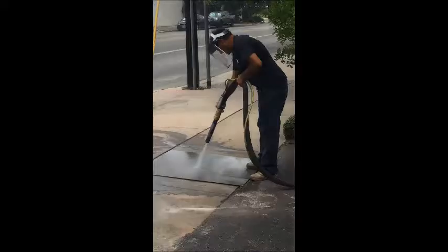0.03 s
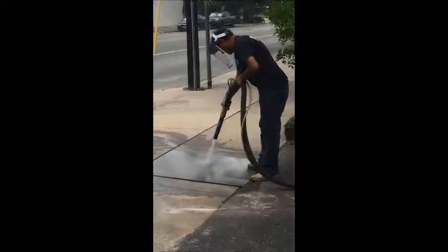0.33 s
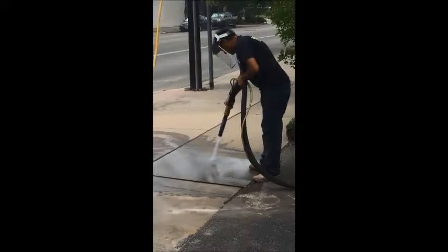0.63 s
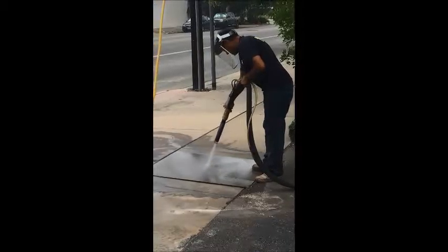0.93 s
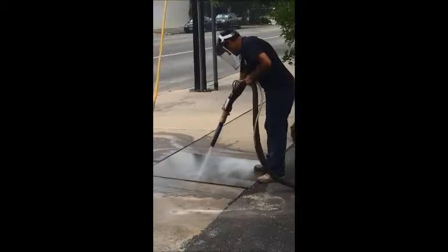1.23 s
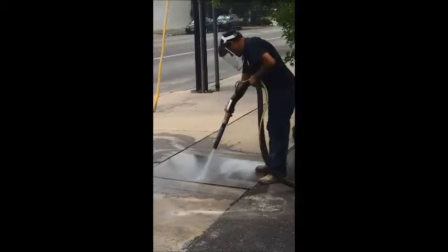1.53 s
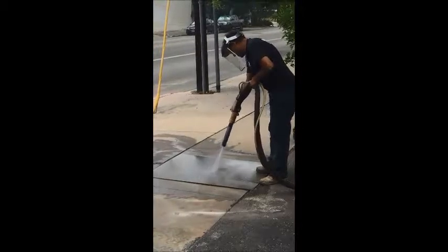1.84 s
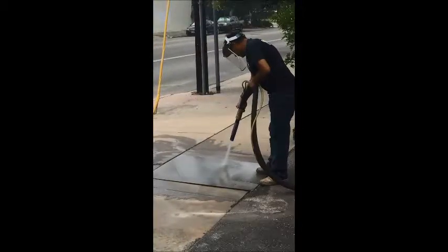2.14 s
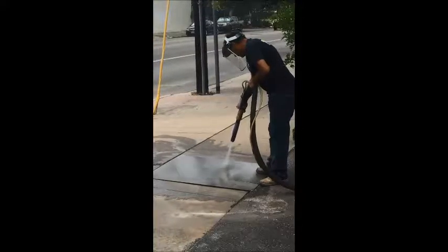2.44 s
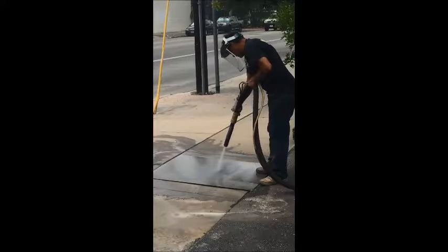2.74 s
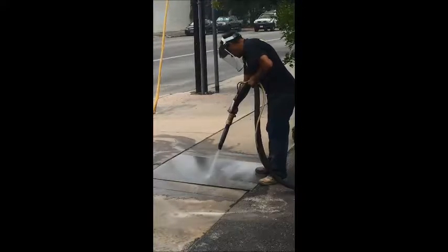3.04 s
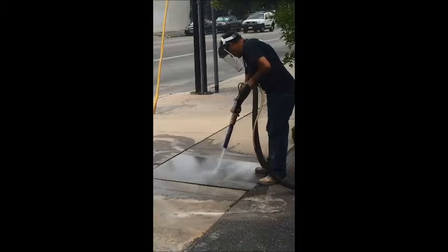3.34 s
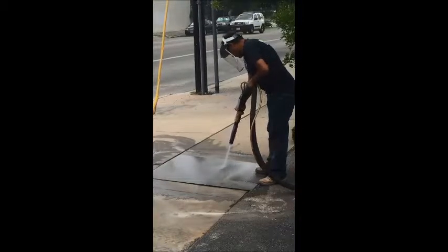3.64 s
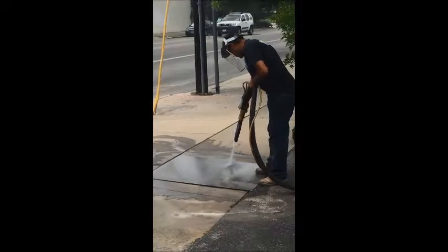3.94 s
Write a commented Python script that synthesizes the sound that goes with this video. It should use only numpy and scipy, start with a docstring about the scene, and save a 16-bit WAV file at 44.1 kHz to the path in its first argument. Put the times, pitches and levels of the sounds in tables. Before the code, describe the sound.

A loud hiss of pressurized spray hitting pavement cuts in just after the start and holds until the end at 4 seconds, mixed with fine spatter. The jet's roar on the concrete sinks around 0.6 to 0.9 seconds and again near 2.5 seconds, swelling back each time while the bright hiss stays even. Underneath, a faint throbbing engine hum, a deeper machine hum and low traffic rumble continue throughout.

```python
"""A steady hiss cuts in: a pressure lance blasts spray onto a pavement beside a road.
Turbulence makes both the nozzle's hiss and the jet's roar on the slab, and the barrel's resonances
colour them. The roar sinks and swells again twice as the lance sweeps to and fro, and drops spatter.
Behind it hum an engine, at harmonics of its firing rate, and a deeper machine, over rumbling traffic."""
import sys
import numpy as np
from scipy import signal
from scipy.fft import rfft, irfft
from scipy.io import wavfile
from scipy.ndimage import uniform_filter1d, map_coordinates

SR = 44100
rng = np.random.default_rng(int(sys.argv[2]) if len(sys.argv) > 2 else 0)


def bounce(signal):
    """Save signal as a 16-bit WAV file at the path given by the first command-line argument."""
    frames = np.transpose(np.atleast_2d(signal))
    limited = np.clip(frames, -1, 1)
    pcm = np.round(limited * 32767).astype(np.int16)
    wavfile.write(sys.argv[1], SR, pcm)


N = 176400
TIME = np.arange(N) / SR
BIN_HZ = np.fft.rfftfreq(N, 1 / SR)

# Nozzle hiss. Each row: frequency in Hz, base level in dB per Hz.
HISS_SPECTRUM = [(100, -85), (480, -69), (720, -63.5), (1300, -56.5), (2300, -61), (3500, -57), (4850, -62),
                 (5900, -59.5), (7600, -61.5), (8500, -58), (9600, -58), (10400, -63), (11300, -58.2),
                 (12300, -58.3), (14000, -62), (15700, -64)]
# Strength of hiss and spatter. Each row: time in seconds, gain in dB.
SPRAY_GAIN = [(.15, -0.2), (.7, -0.3), (1.05, 1.1), (1.3, 0), (1.7, 2), (1.87, 1), (2.18, -0.9),
              (2.55, 0.7), (2.9, 0.6), (3.15, 1), (3.4, 1.5), (3.56, -0.4), (4, -0.5)]
# Resonances of the lance's barrel. Each row: centre in Hz, half-width in Hz, lift in dB.
BARREL_MODES = [(677, 130, 2), (1360, 87, 0.5), (1996, 196, 3.5), (2506, 120, 2.5), (3130, 127, 4.5),
                (3650, 203, 4), (4310, 250, 2.7), (5490, 200, 2.3)]
# Roar on the slab. Each row: frequency in Hz, base level in dB per Hz.
ROAR_SPECTRUM = [(100, -90), (450, -73.5), (750, -64), (1250, -56), (1900, -54.5), (3300, -56.5),
                 (4800, -62), (6500, -59), (9000, -75), (15700, -77)]
# Strength of the roar as the lance sweeps. Each row: time in seconds, gain in dB.
SWEEP_GAIN = [(.15, -0.5), (.45, -2.5), (.62, -7.5), (.92, -11), (1.15, -0.5), (1.36, .3), (1.8, -0.5),
              (2.08, -1.5), (2.3, -5.5), (2.5, -23), (2.66, -8.5), (2.78, -3), (3.05, -0.2), (3.28, 0.5),
              (3.46, 0), (3.6, -2), (3.82, -2.5), (4, -6)]
# Drop impacts. Each row: frequency in Hz, base level in dB per Hz.
SPATTER_SPECTRUM = [(200, -99), (1200, -64), (3500, -65.5), (7000, -72.5), (12000, -69), (15700, -69)]
# Faint copies of the spray. Each row: lag in seconds before the drift is added, linear gain.
SPRAY_COPIES = [(.0043, 0.11), (.0091, .12), (.0170, 0.11)]
# Engine speed. Each row: time in seconds, firing rate in Hz.
FIRING_RATE = [(0, 111.6), (1.5, 111.8), (2.8, 111.6), (4, 111.3)]
# Engine tones. Each row: multiple of the firing rate, base rms level in dB.
ENGINE_HARMONICS = [(1, -38), (2, -49), (3, -49.5), (4, -47), (6, -49.5)]
# Throb of the fundamental. Each row: time in seconds, gain in dB.
THROB_GAIN = [(.22, 2), (.42, -2.5), (.62, 0.5), (.9, 3.5), (1.25, -2), (1.44, 3), (1.68, 1), (1.8, -6),
              (1.98, 0), (2.24, 1.7), (2.48, -1), (2.66, 0), (2.82, 3), (3.05, -1), (3.2, -2.5), (3.55, 1),
              (3.75, -1), (4, -3)]
# Strength of the engine's overtones. Each row: time in seconds, gain in dB.
OVERTONE_GAIN = [(0, -3.5), (1.2, 0.5), (2.5, 1.5), (4, 1)]
# Rumble of road and machinery. Each row: frequency in Hz, base level in dB per Hz.
RUMBLE_SPECTRUM = [(15, -90), (35, -92), (52, -74), (105, -70), (155, -71), (230, -70.5), (310, -65.5),
                   (420, -71.5), (700, -69.5), (2000, -86)]
# Strength of the rumble as cars go by. Each row: time in seconds, gain in dB.
TRAFFIC_GAIN = [(0, -2), (1, 1), (2.1, -1.8), (2.55, 2), (2.85, -0.5), (3.3, -1.5), (4, 0.5)]


def amp(db):
    """Amplitude grows tenfold for every 20 dB."""
    return 10 ** (np.asarray(db) / 20)


def unit_rms(x):
    """Normalisation to an rms of 1."""
    return x / np.sqrt(np.mean(x ** 2) + 1e-20)


def curve(points):
    """Linear interpolation of a time table at every sample."""
    return np.interp(TIME, *np.transpose(points))


def colour(white, spectrum, lift_db=0):
    """Spectral shaping: white sound of rms 1 takes on a density in dB per Hz, plus a lift."""
    hz, db = np.transpose(spectrum)
    shape_db = np.interp(np.log(BIN_HZ + 1), np.log(hz), db) + lift_db
    return irfft(rfft(white) * amp(shape_db), N) * np.sqrt(SR / 2)


def wander(rate_hz):
    """Random modulation of rms 1: noise low-passed to between 1 Hz and about the given rate."""
    response = (BIN_HZ > 1) / (1 + (BIN_HZ / rate_hz) ** 2)
    return unit_rms(irfft(rfft(rng.standard_normal(N)) * response, N))


def turbulence(flutter_db, flutter_hz=70, patch_db=1.12, patch_s=0.05, patch_hz=400):
    """Unsteady flow modulates white noise, as a whole and in patches of time and frequency."""
    hz, seconds, cells = signal.stft(rng.standard_normal(N), SR, nperseg=512)
    patches = rng.standard_normal(cells.shape)
    patches = uniform_filter1d(patches, round(patch_s / seconds[1]), axis=1)
    patches = unit_rms(uniform_filter1d(patches, round(patch_hz / hz[1]), axis=0))
    noise = signal.istft(cells * amp(patch_db * patches), SR, nperseg=512)[1][:N]
    return unit_rms(noise * amp(flutter_db * wander(flutter_hz)))


def jet():
    """Turbulence radiates broadband noise at nozzle and slab; barrel resonances lift narrow bands."""
    barrel_db = sum(db * np.exp(-((BIN_HZ - hz) / width) ** 2) for hz, width, db in BARREL_MODES)
    hiss = colour(turbulence(flutter_db=0.7), HISS_SPECTRUM, barrel_db)
    roar = colour(turbulence(flutter_db=0.6), ROAR_SPECTRUM, barrel_db)
    return hiss * amp(curve(SPRAY_GAIN)) + roar * amp(curve(SWEEP_GAIN))


def spatter(drops_per_s=3500, spread_db=4.0):
    """Shot noise: drops strike the pavement independently, many small and a few large."""
    size_db = spread_db * np.minimum(rng.exponential(1, N), 4)
    polarity = np.sign(rng.standard_normal(N))
    strikes = rng.random(N) < drops_per_s / SR
    ticks = unit_rms(amp(size_db) * polarity * strikes)
    return colour(ticks, SPATTER_SPECTRUM) * amp(curve(SPRAY_GAIN))


def thicken(spray, drift_s_per_db=0.05):
    """Superposition: faint time-warped copies of the spray, mostly ahead of it, thicken the hiss."""
    drift_s = drift_s_per_db * curve(SWEEP_GAIN)  # mostly negative: a lead of up to about 1.1 s
    total = spray
    for lag_s, gain in SPRAY_COPIES:
        positions = (TIME - lag_s - drift_s) * SR
        total = total + gain * map_coordinates(spray, [positions], order=3)
    return total


def engine(waver_hz=9.6, waver_db=2, pitch_wander=0.0034):
    """Periodic firing at a governed speed gives a throbbing fundamental and wavering harmonics."""
    firing_hz = curve(FIRING_RATE) * (1 + pitch_wander * wander(waver_hz))
    cycles = np.cumsum(firing_hz) / SR
    tones = np.zeros(N)
    for order, db in ENGINE_HARMONICS:
        if order == 1:
            sway_db = curve(THROB_GAIN)
        else:
            sway_db = curve(OVERTONE_GAIN) + waver_db * wander(waver_hz)
        tones += amp(db + sway_db) * np.sin(2 * np.pi * (order * cycles + rng.random()))
    return np.sqrt(2) * tones


def machine_hum(hz=64.8, rms_db=-47, waver_db=0.3):
    """A second machine hums lower: a pure tone under slight amplitude modulation."""
    level_db = rms_db + waver_db * wander(rate_hz=9.6)
    return np.sqrt(2) * amp(level_db) * np.sin(2 * np.pi * hz * TIME)


def road_rumble():
    """Incoherent sources sum to low-frequency noise, which swells a little with the traffic."""
    return colour(rng.standard_normal(N), RUMBLE_SPECTRUM) * amp(curve(TRAFFIC_GAIN))


def scene():
    """Superposition: all sources add at one point, the same in both channels."""
    spray = thicken(jet() + spatter())
    mono = spray + engine() + machine_hum() + road_rumble()
    return np.array([mono, mono])


def record(dry, start_s=0.1537, cutoff_hz=15800):
    """Gating and band limiting: the sound cuts in at once, and a low-pass removes the top treble."""
    lowpass = signal.firwin(511, cutoff_hz, window=("kaiser", 9), fs=SR)
    return signal.oaconvolve(dry * (TIME >= start_s), lowpass[None], "same")


dry = scene()
out = record(dry)
bounce(out)
```